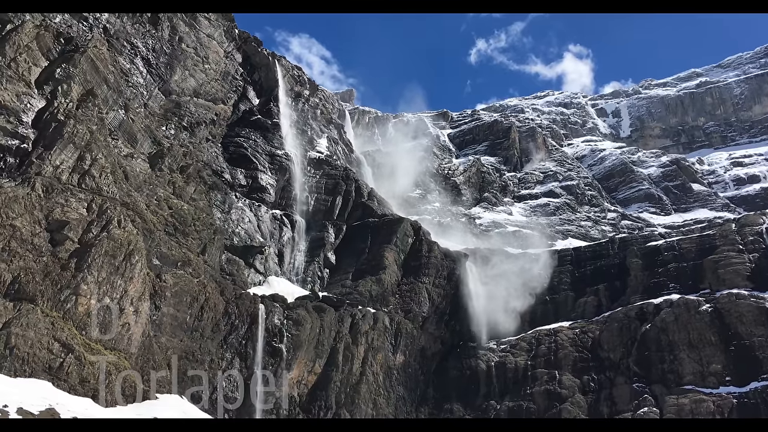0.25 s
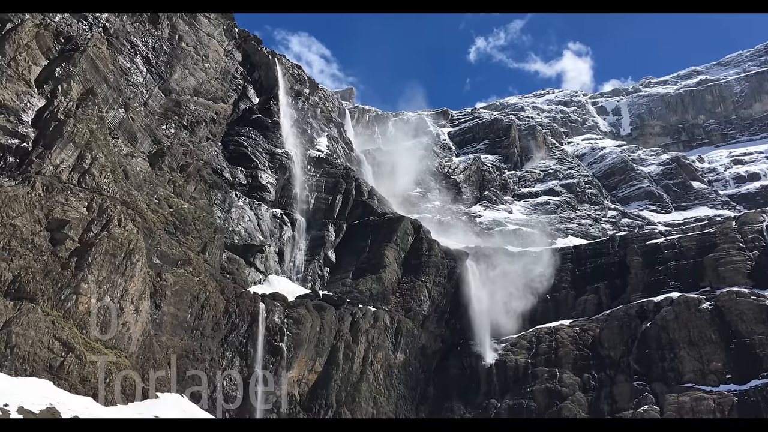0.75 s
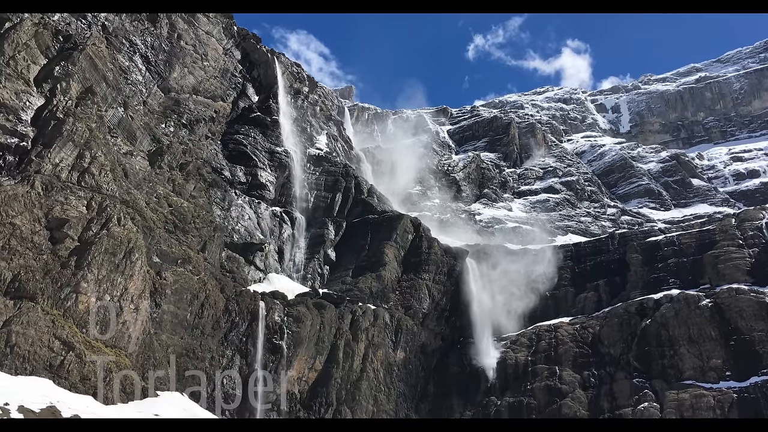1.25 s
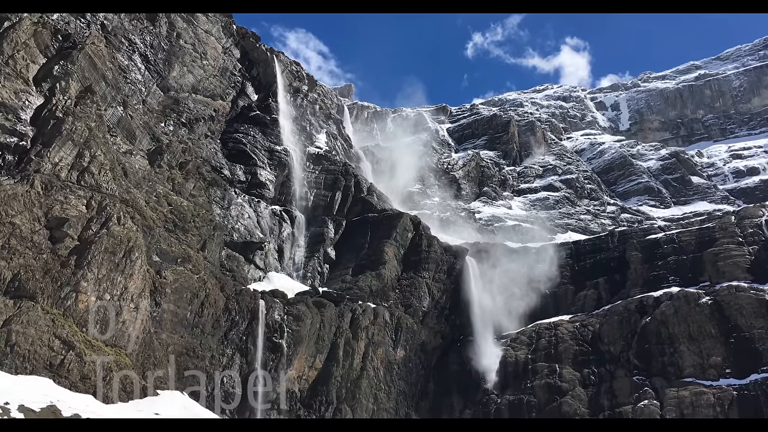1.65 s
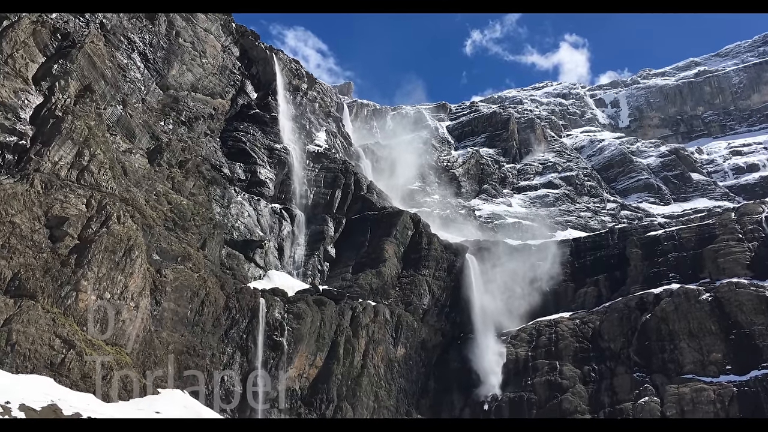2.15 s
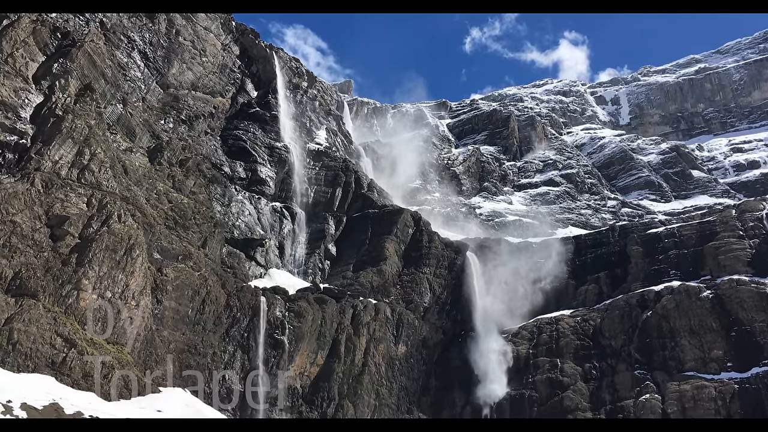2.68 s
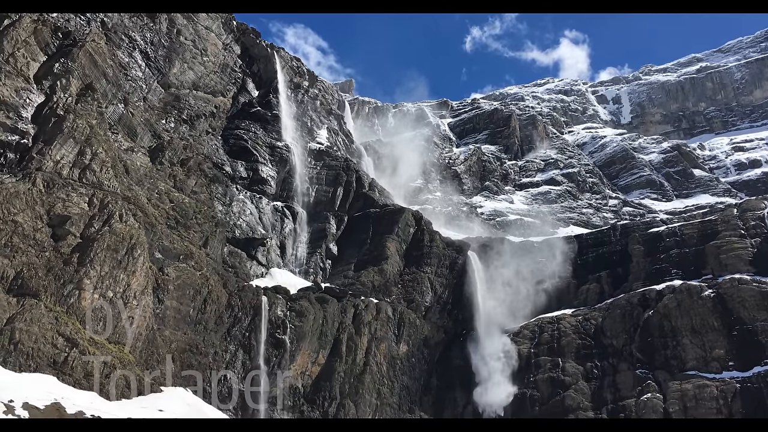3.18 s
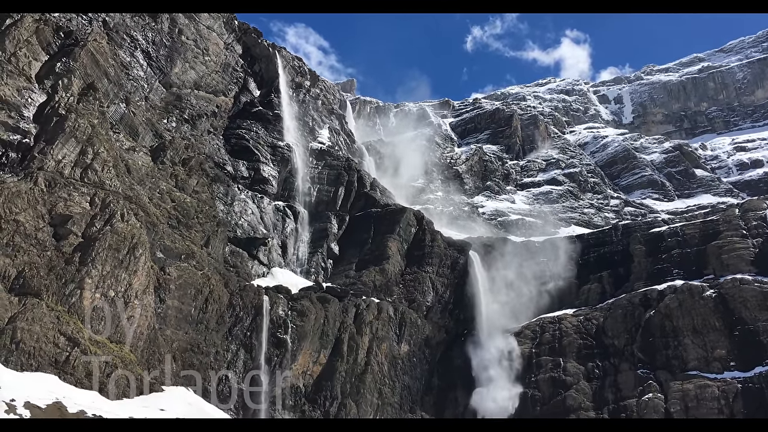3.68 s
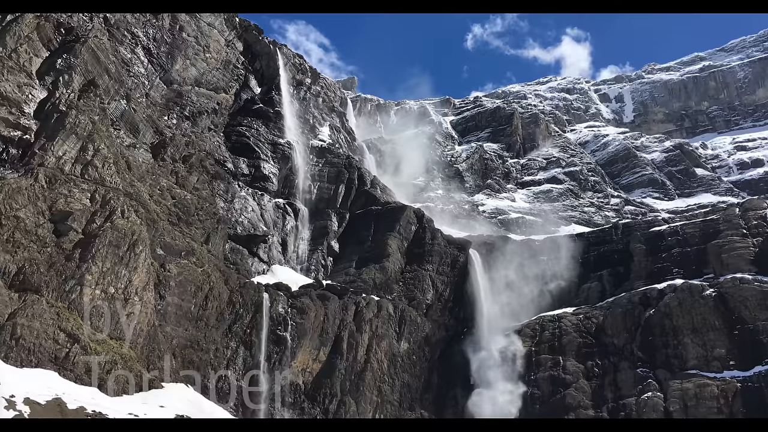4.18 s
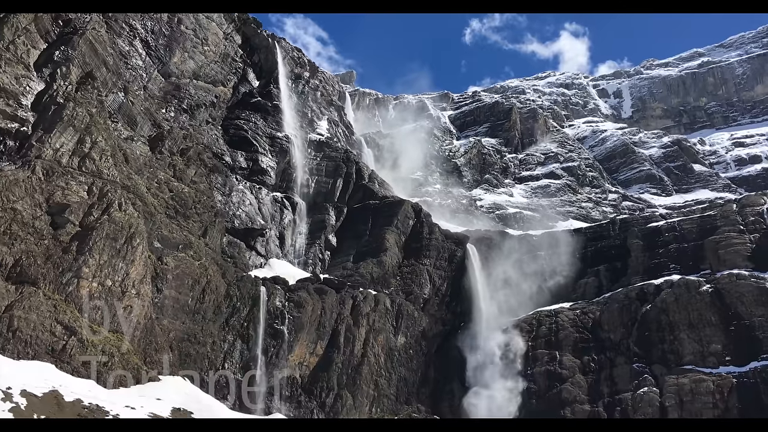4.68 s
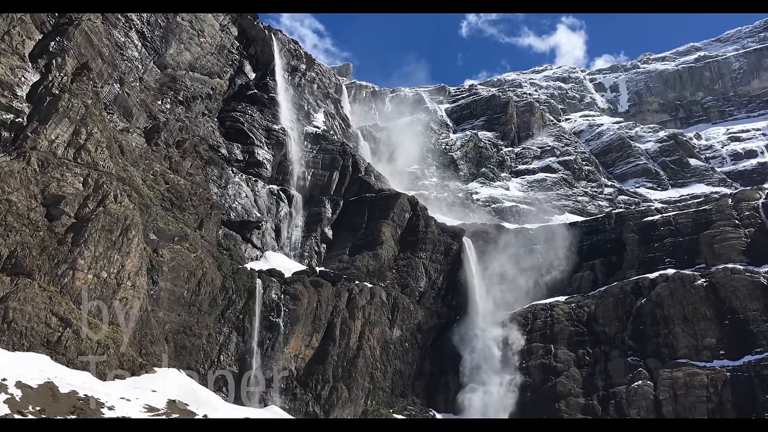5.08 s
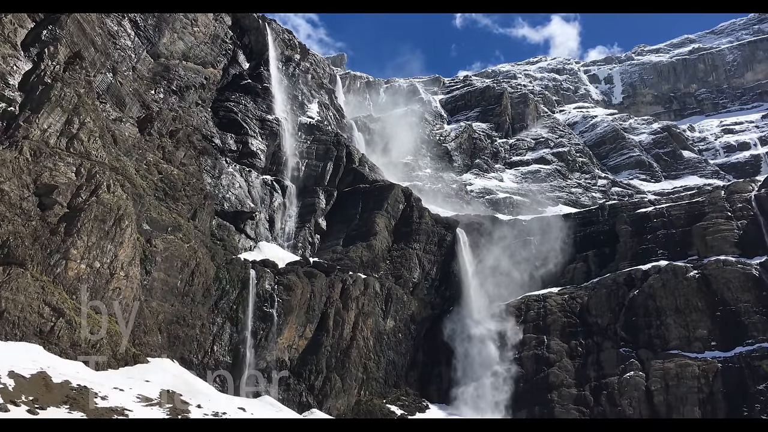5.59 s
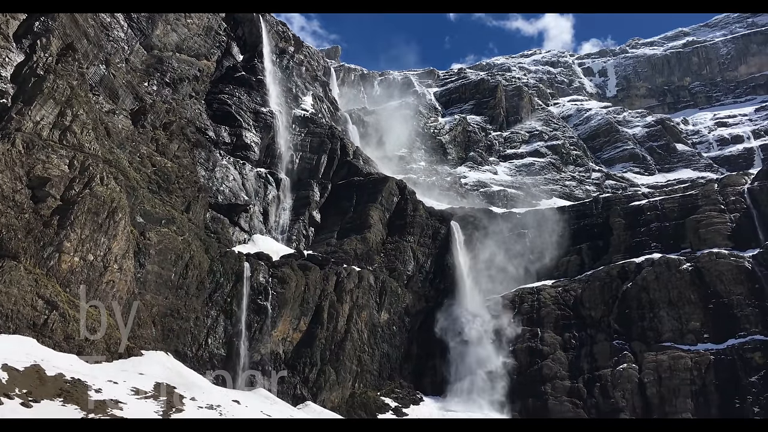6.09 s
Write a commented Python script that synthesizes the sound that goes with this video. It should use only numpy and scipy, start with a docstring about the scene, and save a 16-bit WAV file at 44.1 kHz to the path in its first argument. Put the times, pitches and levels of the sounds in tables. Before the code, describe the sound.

Far waterfalls rush steadily, then falling ice and snow land with cracks and thuds, swelling into a heavy rumble.

```python
"""Avalanche across the valley

Snow pours over a high cliff, far across an open valley from the microphone; meltwater falls steadily.
The first ice lumps clatter on bare rock, then the mass lands: a dense pounding of clods that sinks
into a deep rumble, with single big blocks thudding out of it. On the way over, the air dulls the
treble, the ground colours the pounding and the valley walls smear the avalanche with their echo."""
import sys
import numpy as np
from scipy import signal
from scipy.fft import rfft, irfft, next_fast_len
from scipy.io import wavfile
from scipy.ndimage import map_coordinates

SR = 44100
rng = np.random.default_rng(int(sys.argv[2]) if len(sys.argv) > 2 else 0)


def generate_wav(sig):
    """Save sig (samples, or channels by samples) to the path in sys.argv[1] as 16-bit PCM at SR."""
    pcm = np.round(np.clip(np.atleast_2d(sig).T, -1, 1) * 32767).astype(np.int16)
    wavfile.write(sys.argv[1], SR, pcm)


N = 279594

# Distant meltwater and the microphone's own hiss. Each row: frequency in Hz, relative level in dB.
FALLS_SPECTRUM = [(15, -48.5), (28, -23), (48, -10.5), (85, -5), (135, -2), (270, -6.5), (420, -9.5),
                  (560, -11), (760, -13), (1100, -13.5), (2000, -19), (3500, -31.5), (4300, -41),
                  (5000, -52)]
HISS_SPECTRUM = [(1000, -13), (5000, 0), (7500, -3.5), (12500, -6), (15000, -21)]
# Echo off the valley walls. Each row: frequency in Hz, seconds to die away by 60 dB.
WALL_DECAY = [(60, 1.6), (500, 1.4), (4000, 0.39)]
# Moving snow, from the upper slope to the landing. Each row: frequency in Hz, relative level in dB.
TUMBLE_SPECTRUM = [(30, -29), (80, -5), (130, 1.5), (200, -0.5), (270, -4), (400, -10), (600, -23),
                   (1500, -59.5), (4000, -120)]
RUMBLE_SPECTRUM = [(15, -56.5), (28, -13), (42, -0.5), (58, 5.5), (78, -4), (115, -4), (170, -17.5),
                   (400, -81.5), (1000, -120)]
LIGHT_CLOD_SPECTRUM = [(90, -25.5), (250, -7), (330, -2.5), (430, 1.5), (500, -3), (600, -0.5), (690, -0.5),
                       (820, -7), (1100, -16), (2200, -31), (5000, -73.5), (8000, -120)]
HEAVY_CLOD_SPECTRUM = [(40, -34.5), (90, -12.5), (130, -0.5), (175, -2), (215, 0), (300, -6.5), (450, -11),
                       (900, -28), (2500, -85), (6000, -120)]
# Chips, splinters and ice striking rock or snow. Each row: frequency in Hz, relative level in dB.
GRIT_SPECTRUM = [(600, -29), (1500, 1), (2300, 3), (3200, -12.5), (4300, -24.5), (5200, -48), (9000, -100)]
SNAP_SPECTRUM = [(200, -30), (700, -5.5), (1400, 0), (2000, -9.5), (3000, -26), (5000, -60), (9000, -100)]
BARE_ICE_SPECTRUM = [(150, -22.5), (500, -13.5), (1000, 3.5), (1500, 0), (1800, -5.5), (2100, -6.5),
                     (2900, -19.5), (3500, -26.5), (4300, -38), (5200, -54.5), (9000, -100)]
MUFFLED_ICE_SPECTRUM = [(200, -14), (700, 2), (1000, -1), (1600, -1), (2100, -7.5), (2900, -23),
                        (3400, -25.5), (4300, -37.5), (5200, -56), (9000, -100)]
# The two parts of a big block's impact. Each row: frequency in Hz, relative level in dB.
THUD_SPECTRUM = [(20, -46), (60, -22), (130, -7.5), (220, 3.5), (330, -11), (660, -24.5), (1100, -40.5),
                 (4000, -86), (8000, -120)]
CRACK_SPECTRUM = [(200, -20.5), (700, -0.5), (1100, 4.5), (1550, 0.5), (2100, -5), (2900, -15),
                  (3500, -21.5), (4400, -36.5), (5500, -53.5), (9000, -100)]
# Weight of the sliding mass. Each row: time in seconds, rumble level in dB.
MASS_LEVELS = [(.4, -52.5), (1.7, -59), (2.3, -56), (2.8, -47), (3.3, -48.5), (3.7, -45), (4.1, -43),
               (4.6, -43), (5.05, -39.5), (6.3, -40)]
# Snow coming down on the landing. Each row: time in seconds, flow level in dB.
FLOW_LEVELS = [(2.35, -37), (3.1, -35.3), (3.55, -32), (3.85, -31.5), (4.3, -31.5), (4.8, -32), (5.9, -33),
               (6.3, -31)]
# Slabs shatter and swell the lighter debris. Each row: centre and spread in seconds, swell in dB.
SLAB_SWELLS = [(3.54, .05, 0.5), (5.01, .055, 4), (5.2, 0.11, 2)]
# The stream thins between clumps. Each row: centre and spread in seconds, dip in dB.
FLOW_LULLS = [(2.70, 0.032, 3), (2.87, .04, 2.5), (4.52, .04, 0.5), (4.68, .05, 2.5), (4.90, 0.022, 1),
              (5.36, 0.033, 1), (6.04, .04, 1.5)]
# Stray ice snapping on the cliff. Each row: start in seconds, level in dB, pitch in Hz.
SPLINTER_HITS = [(.824, -42.5, 1410), (2.146, -36.5, 1360), (2.244, -37, 1100), (2.382, -39, 1000),
                 (2.465, -37, 1150), (2.600, -41, 1700), (3.315, -46, 2270), (3.452, -48, 2690),
                 (3.741, -40, 1870), (5.732, -49, 2400)]
# Big blocks landing. Each row: start in seconds, thud level in dB, thud pitch in Hz,
# crack level in dB, decay time in seconds.
BLOCK_HITS = [(2.215, -29, 180, -38, 0.0042), (2.294, -33.5, 476, -38, 0.0085),
              (2.336, -36, 220, -37, 0.011), (2.55, -35, 330, -42.5, 0.0081), (2.779, -38, 62, -51.5, .022),
              (2.819, -28, 192, -40.5, 0.0049), (2.823, -25.5, 380, -29.5, 0.0043),
              (3.148, -26, 220, -47, 0.0047), (3.150, -29, 630, -45.5, 0.0039),
              (3.222, -34, 425, -41.5, 0.0061), (3.503, -24.5, 535, -41.5, 0.0048),
              (3.542, -27.5, 382, -46, 0.0078), (3.596, -23.5, 215, -39, 0.0098),
              (3.653, -27, 252, -48, 0.02), (3.669, -31, 396, -38.5, 0.0067),
              (3.828, -28.5, 201, -50.5, 0.01), (3.894, -24, 228, -41, 0.021),
              (4.073, -31.5, 698, -43, 0.0035), (4.12, -29.5, 476, -44, .005),
              (4.21, -30, 188, -44.5, 0.014), (4.368, -26.5, 520, -45, 0.005), (4.584, -27, 254, -44, 0.02),
              (4.787, -32, 684, -48.5, 0.017), (4.855, -26.5, 170, -48, 0.011),
              (4.999, -30, 600, -46.5, 0.011), (5.019, -25, 420, -41, 0.0043),
              (5.05, -29.5, 560, -50, .006), (5.069, -31.5, 60.4, -52, 0.023),
              (5.076, -27.5, 171, -52.5, 0.018), (5.407, -27.5, 212, -46, 0.02),
              (5.461, -30.5, 56, -55.5, .025), (5.531, -28.5, 205, -52.5, 0.01),
              (5.744, -26.5, 190, -48, 0.014), (6.210, -31, 680, -48, 0.0037),
              (6.24, -29.5, 135, -54, 0.019), (6.305, -27, 170, -54, 0.02)]

LANDING_S, BUILD_S = 2.04, 0.41  # the leading edge reaches the rock; time to full strength
BURIAL_S, COVER_S = 3.085, 0.03  # snow covers the rock; time that takes


def amp(db):
    """Decibels to gain."""
    return 10 ** (np.asarray(db) / 20)


def unit(x):
    """Scale to rms 1."""
    return x / np.sqrt(np.mean(x ** 2) + 1e-20)


def along(points, hz):
    """(Hz, value) points read on a log frequency axis."""
    freqs, values = np.transpose(points)
    return np.interp(np.log(hz + 1), np.log(freqs + 1), values)


def curve(rows):
    """(seconds, value) rows read at every sample."""
    return np.interp(np.arange(N) / SR, *np.transpose(rows))


def since(start):
    """Seconds since start at every sample, 0 before it."""
    return np.maximum(np.arange(N) / SR - start, 0)


def ramp(start_s, length_s):
    """Rise evenly from 0 to 1."""
    return np.clip(since(start_s) / length_s, 0, 1)


def humps(rows):
    """A bell-shaped rise in dB for each row."""
    return sum(db * np.exp(-((since(0) - centre) / spread) ** 2) for centre, spread, db in rows)


def wobble(rate):
    """A smooth random curve, rate knots a second."""
    knots = rng.standard_normal(int(N * rate / SR) + 4)
    return map_coordinates(knots, [np.arange(N) * rate / SR])


def blend(a, b, share):
    """Pass from a to b at constant power."""
    share = np.clip(share, 0, 1)
    return np.sqrt(1 - share) * a + np.sqrt(share) * b


def filtered(x, response):
    """Filter x by a function of frequency."""
    size = next_fast_len(len(x) + SR // 4)
    return irfft(rfft(x, size) * response(np.fft.rfftfreq(size, 1 / SR)), size)[:len(x)]


def coloured(x, spectrum):
    """x shaped by a spectrum, at rms 1."""
    return unit(filtered(x, lambda hz: amp(along(spectrum, hz))))


def shifted(spectrum, ratio):
    """The same spectrum at ratio times the pitch."""
    return [(hz * ratio, db) for hz, db in spectrum]


def shower(spectrum, rate, scatter_db, powder):
    """Impacts of scattered size, rate a second, in the even rush of powder (a share 0-1)."""
    hits = (rng.random(N) < rate / SR) * rng.choice([-1, 1], N)
    sizes = amp(scatter_db * np.clip(rng.standard_normal(N), -2, 2))
    return coloured(blend(unit(hits * sizes), rng.standard_normal(N), powder), spectrum)


def bursts(rows, attack_s=0.0043):
    """Single impacts, each a quickly dying burst of noise."""
    track, lead = np.zeros(N + SR), SR // 20
    t = np.maximum(np.arange(SR // 3) - lead, 0) / SR  # time since contact
    for start, db, decay_s, spectrum in rows:
        envelope = (1 - np.exp(-t / attack_s)) * np.exp(-t / decay_s)
        blow = coloured(envelope * rng.standard_normal(len(t)), spectrum)
        blow /= np.sqrt(np.sum(blow ** 2) / (decay_s * SR))
        track[round(start * SR) - lead:][:len(t)] += amp(db) * blow
    return track[:N]


def air(x, edge_hz):
    """The long way through the air to the microphone takes the treble."""
    return filtered(x, lambda hz: 1 / (1 + (hz / edge_hz) ** 12))


def ground(x, delay_s, strength):
    """A bounce off the ground arrives late and ripples the low end; rough ground scatters its highs."""
    def response(hz):
        return 1 + strength * np.exp(-2j * np.pi * hz * delay_s) / (1 + (hz / 1100) ** 2)
    return filtered(x, response) / np.hypot(1, strength)


def valley_echo(x):
    """The rock walls answer with a diffuse tail whose highs die first."""
    hz, t, noise = signal.stft(rng.standard_normal(SR * 3 // 2), SR, nperseg=256)
    decay = amp(-60 * t / along(WALL_DECAY, hz)[:, None])
    tail = signal.istft(noise * decay, SR, nperseg=256)[1]
    return signal.fftconvolve(x, tail / np.linalg.norm(tail))[:N]


def waterfalls():
    """Far off, meltwater falls from high on the cliff: a steady, slightly restless roar."""
    roar = air(shower(FALLS_SPECTRUM, rate=900, scatter_db=1.0, powder=0.7), edge_hz=5860)
    return roar * amp(-43.4 + 0.3 * wobble(3.4) + 0.14 * wobble(15))


def tumbling():
    """Clods bound down the upper slope with an uneven, dull churning."""
    return amp(-49 + 1.5 * wobble(16)) * shower(TUMBLE_SPECTRUM, rate=60, scatter_db=2.0, powder=0.23)


def softening_db(cover_db=2.5, db_per_s=2):
    """What hard impacts lose: a step as snow covers the rock, then more as the heap deepens."""
    return cover_db * ramp(BURIAL_S, COVER_S) + db_per_s * since(BURIAL_S)


def grit():
    """Fine chips of ice and stone fly out of the stream and tick on the rock."""
    chips = shower(GRIT_SPECTRUM, rate=140, scatter_db=2.5, powder=0.082)
    return amp(curve(FLOW_LEVELS) - 22.5 - 0.5 * softening_db()) * ramp(LANDING_S, BUILD_S) * chips


def splinters(decay_s=0.0057, base_hz=1420):
    """Small pieces of ice fly clear and snap on bare rock, the smallest highest."""
    snaps = [(start, db, decay_s, shifted(SNAP_SPECTRUM, hz / base_hz))
             for start, db, hz in SPLINTER_HITS]
    return air(bursts(snaps), edge_hz=3700)


def ice_clatter():
    """Ice rattles on bare rock, then more finely and dully on the heap; shattering slabs add to it."""
    bare = shower(BARE_ICE_SPECTRUM, rate=700, scatter_db=3.5, powder=0.65)
    muffled = shower(MUFFLED_ICE_SPECTRUM, rate=1200, scatter_db=4, powder=0.57)
    level_db = -39 + humps(SLAB_SWELLS) - softening_db() + 0.66 * wobble(40)
    return amp(level_db) * blend(bare, muffled, ramp(BURIAL_S, COVER_S))


def blocks(base_hz=215):
    """Each big block bursts with a crack and a short thud, lower the bigger it is."""
    thuds = [(start, db, decay_s, shifted(THUD_SPECTRUM, hz / base_hz))
             for start, db, hz, _, decay_s in BLOCK_HITS]
    cracks = [(start, db, decay_s, CRACK_SPECTRUM) for start, _, _, db, decay_s in BLOCK_HITS]
    return air(bursts(thuds), edge_hz=2700) + bursts(cracks)


def sliding_mass():
    """A deep rumble carries across the valley, growing with the weight of moving snow."""
    rumble = shower(RUMBLE_SPECTRUM, rate=77, scatter_db=3.0, powder=0.78)
    return amp(curve(MASS_LEVELS) + 1.3 * wobble(16)) * rumble


def clods():
    """Snow clods pound the foot of the cliff, each size at its own uneven pace, the largest last."""
    light_gain = amp(humps(SLAB_SWELLS) + 0.63 * wobble(20))
    light = light_gain * shower(LIGHT_CLOD_SPECTRUM, rate=650, scatter_db=3.0, powder=0.39)
    large, largest = [shower(spectrum, rate=130, scatter_db=2.5, powder=0.46)
                      for spectrum in (HEAVY_CLOD_SPECTRUM, shifted(HEAVY_CLOD_SPECTRUM, 0.84))]
    heavy = amp(0.56 * wobble(20)) * blend(large, largest, ramp(start_s=4.62, length_s=1.6))
    heavy_share = 0.36 + 0.091 * since(LANDING_S)
    return amp(curve(FLOW_LEVELS) - humps(FLOW_LULLS)) * blend(light, heavy, heavy_share)


def avalanche():
    """The mass rumbles down the slope, then lands in separate lumps that merge as the flow builds."""
    rumble = sliding_mass()
    debris = clods() + ice_clatter()
    build = ramp(LANDING_S, BUILD_S)
    onset = build ** 1.36  # the thin leading edge makes a slow start
    lumps_db = 5.5 * (1 - build) * wobble(50)
    return rumble + onset * amp(lumps_db) * debris


def scene():
    """From across the valley, in mono: the avalanche and its echo over the waterfalls."""
    snow = ground(avalanche(), delay_s=0.0048, strength=0.11)
    snow += blocks() + splinters() + grit() + tumbling()
    return (snow + amp(-15) * valley_echo(snow) + waterfalls())[None]


def record(dry):
    """The microphone adds a faint hiss and keeps nothing above its band limit."""
    hiss = amp(-82.0) * coloured(rng.standard_normal(N), HISS_SPECTRUM)
    return filtered(dry[0] + hiss, lambda hz: hz < 14900)[None]


dry = scene()
out = record(dry)
generate_wav(out)
```